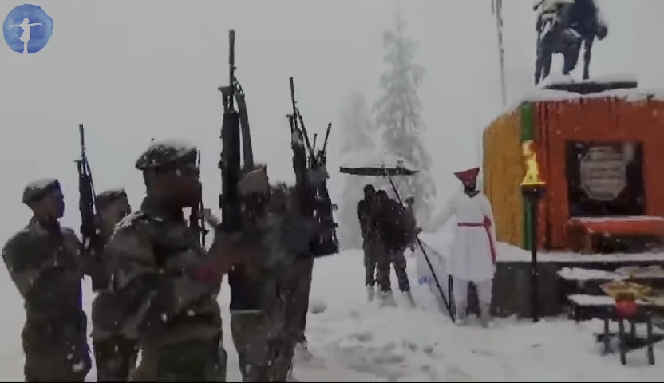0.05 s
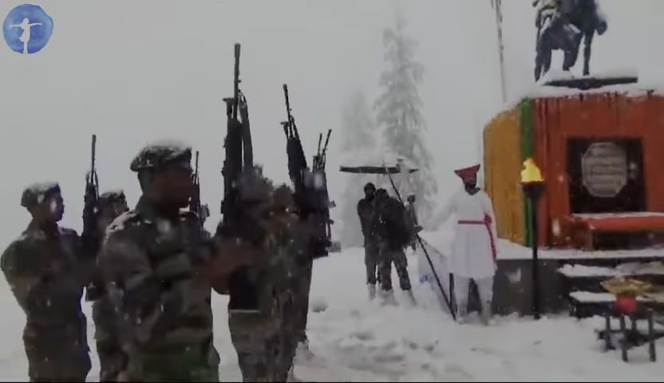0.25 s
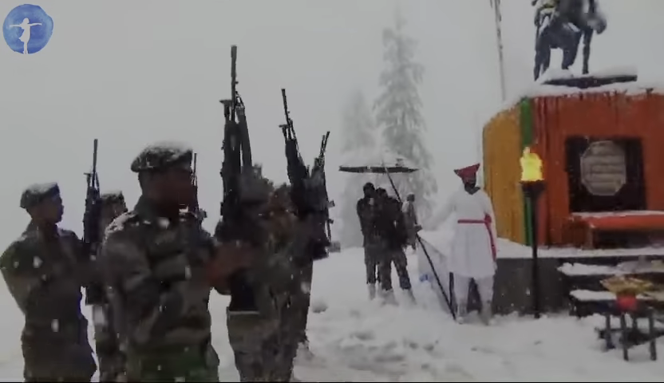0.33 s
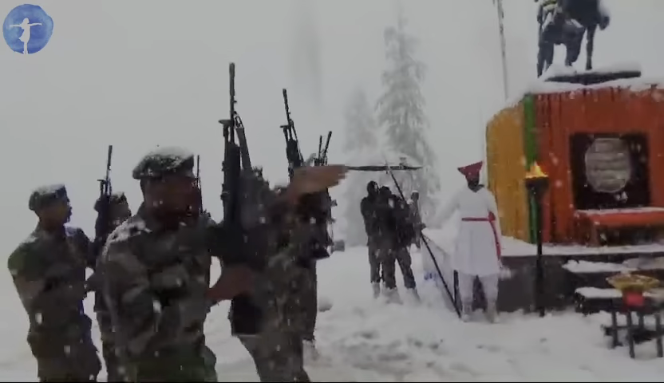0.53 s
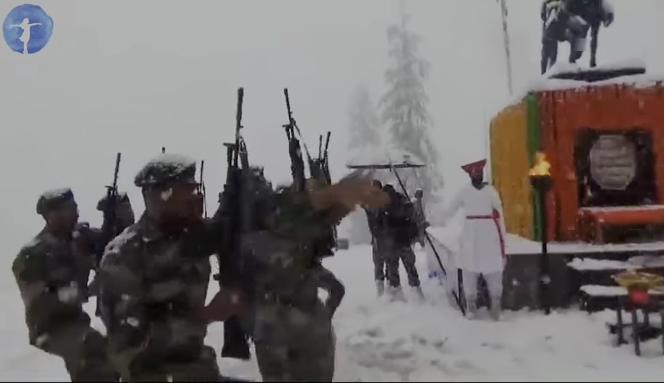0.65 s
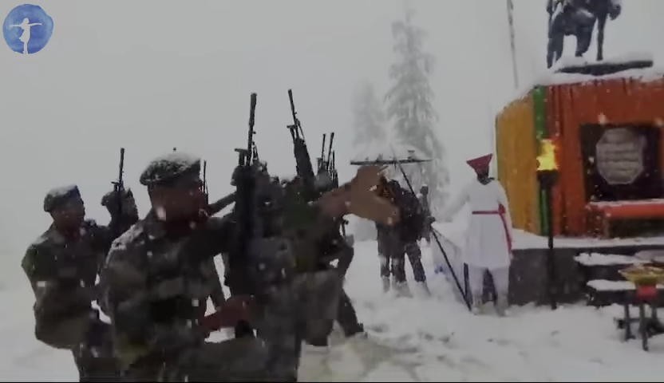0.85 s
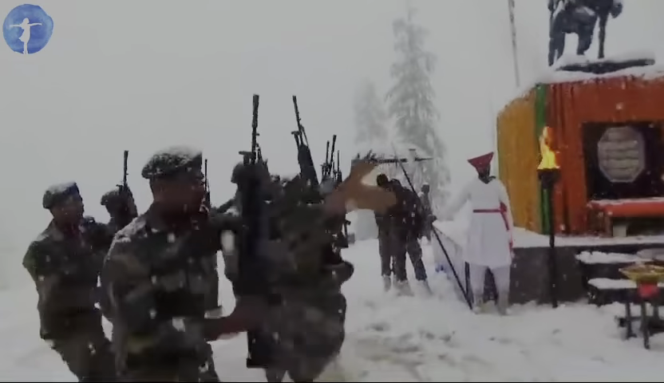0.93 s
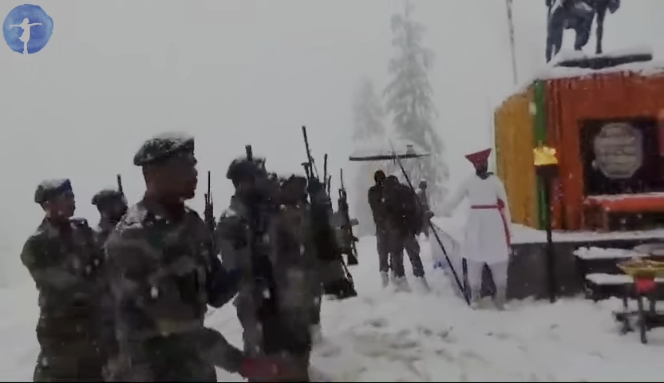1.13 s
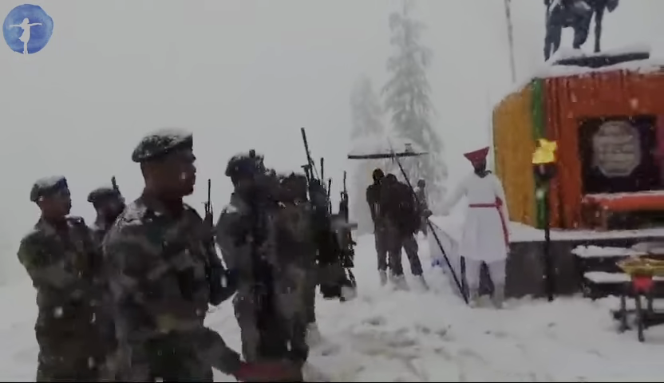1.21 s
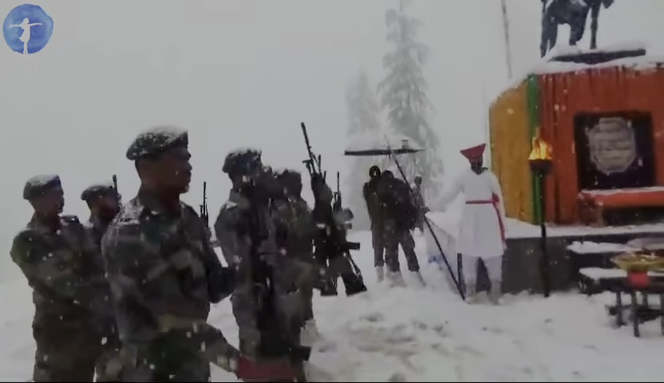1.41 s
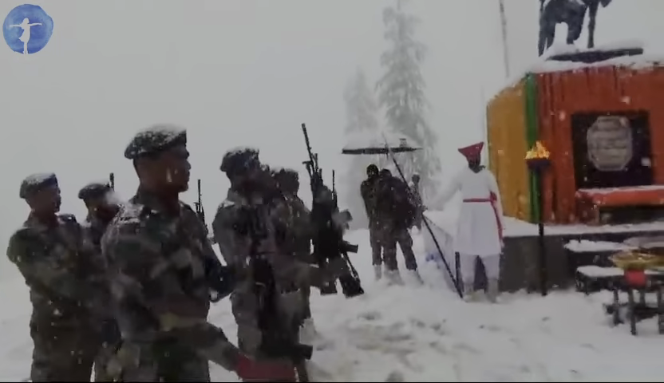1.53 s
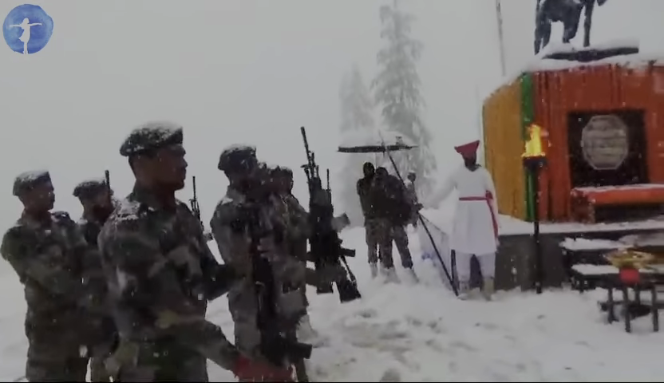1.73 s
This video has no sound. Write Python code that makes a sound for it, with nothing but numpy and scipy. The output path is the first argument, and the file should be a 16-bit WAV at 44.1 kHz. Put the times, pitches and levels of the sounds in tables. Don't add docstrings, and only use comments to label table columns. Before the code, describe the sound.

Soldiers' palms slap rifle hand guards in two ragged volleys, with boot thumps on packed snow

```python
import sys
import numpy as np
from scipy import signal
from scipy.fft import rfft, irfft
from scipy.io import wavfile
from scipy.ndimage import uniform_filter1d

SR = 44100
rng = np.random.default_rng(int(sys.argv[2]) if len(sys.argv) > 2 else 0)


def voltage_ratio(level):
    return 10 ** (np.asarray(level, float) / 20)


def unload_audio(sound):
    columns = np.transpose(np.atleast_2d(sound))
    steps = np.round(np.clip(columns, -1, 1) * 32767)
    wavfile.write(sys.argv[1], SR, steps.astype(np.int16))


N = 79380

# start_s, crack_db, body_db, grip_hz
FIRST_VOLLEY = [(0.2396, -6, -23, 690), (0.2445, -14.5, -16.5, 950), (0.2500, -8, -20, 962),
                (0.2570, -12, -22, 790), (0.2635, -10, -18, 820), (0.2700, -13, -13.5, 1563),
                (0.2757, -7, -10.5, 888), (0.2840, -11, -20, 810), (0.2991, -8, -14.5, 847),
                (0.3040, -13.5, -12, 1588), (0.3090, -8.5, -17.5, 1470), (0.3183, -5.5, -15.5, 880),
                (0.3214, -9, -20, 1524), (0.3304, -14, -16.5, 1206), (0.3392, -17, -14, 1426),
                (0.3440, -15.5, -24, 1560), (0.3500, -12.5, -18, 830), (0.3560, -12.5, -25, 1567),
                (0.3640, -24, -21, 708), (0.3729, -21, -21.5, 1700), (0.3804, -33, -28.5, 1185)]
# start_s, crack_db, body_db, grip_hz
SECOND_VOLLEY = [(1.0546, -28, -13.5, 1620), (1.057, -21, -19.5, 1230), (1.0872, -26, -29, 800),
                 (1.0954, -10.5, -18, 2190), (1.0991, -10, -19, 1560), (1.1024, -14.5, -17, 973),
                 (1.1074, -11, -24, 760), (1.1134, -10.5, -12, 647), (1.1214, -20, -23, 604),
                 (1.1284, -18, -50, 700), (1.1345, -10, -12.5, 1200), (1.1464, -14, -31, 720),
                 (1.1544, -30, -24, 510), (1.1659, -12, -18.5, 1598), (1.1834, -25.5, -17.5, 1110)]
# start_s, crack_db, body_db, grip_hz, ring_factor
STRAY_PALMS = [(0.0034, -32.5, -33.5, 690, 0.41), (0.0511, -18.5, -21, 717, 0.38),
               (0.0836, -37, -27, 1150, 1.13), (0.5153, -16.5, -22.5, 633, 0.69),
               (0.5178, -11.5, -26, 880, 0.38), (0.6434, -21.5, -19, 1883, 1.27),
               (0.6485, -20.5, -20, 710, 0.82), (0.6932, -27, -25, 794, 1.56),
               (0.7206, -23, -23.5, 694, 0.89), (0.977, -50, -33, 650, 1.3), (1.3383, -32, -38, 1100, 0.49)]
# mode_hz, level_db
GUARD_MODES = [(680, 2.5), (745, -1), (850, -2), (1080, -5), (1220, -6.5), (1390, -6), (1550, 2.5),
               (1630, 0.5), (1760, -3.5), (1940, -2.5), (2300, -3)]
# freq_hz, density_db_per_hz
CRACK_COLOUR = [(150, -50), (550, -12), (1500, -1), (2200, -1), (3400, 1), (8200, -4.5), (11000, -7)]
# start_s, level_db
MAGAZINE_KNOCKS = [(0.011, -25.5), (0.034, -29.5), (0.76, -39), (0.644, -12), (0.678, -33), (0.696, -35),
                   (0.721, -27), (0.909, -37), (0.929, -33), (1.031, -29), (1.353, -34), (1.477, -39),
                   (1.604, -41.5), (1.728, -37)]
# start_s, level_db, pitch_hz, t60_s
BOOT_STAMPS = [(0.241, -36, 196, 0.053), (0.262, -36, 257, 0.034), (0.307, -34.5, 129.5, 0.059),
               (0.351, -13, 307, 0.028), (0.513, -14, 184, 0.024), (.585, -37.5, 95, 0.069),
               (0.642, -33, 135, 0.091), (0.7, -37.5, 118, 0.069), (1.086, -21, 147, 0.096),
               (1.107, -9, 299, 0.054), (1.122, -16.5, 99, 0.053), (1.164, -9.5, 142.4, 0.062),
               (1.184, -38, 112, 0.15), (1.207, -29, 113.4, 0.056)]
# start_s, level_db, colour_hz, t60_s
METAL_SNAPS = [(0.2393, -13, 5000, 0.0034), (0.2515, -5.5, 8440, 0.01), (0.262, -8, 5500, 0.013),
               (0.2675, -8, 8800, 0.0087), (0.3015, -16, 6600, .01), (0.3187, -19, 3300, 0.0085),
               (0.3512, -11, 9500, .006), (0.374, -14, 9800, .008), (0.509, -26.5, 2820, 0.052),
               (0.5172, -16, 8350, 0.024), (0.5347, -29, 8500, 0.017), (0.5535, -28, 8400, .04),
               (0.5662, -25, 8300, 0.027), (0.828, -37, 2820, 0.036), (0.846, -39, 1570, 0.037),
               (0.879, -52, 1200, .03), (0.905, -47, 2970, 0.023), (0.935, -46, 3880, 0.029),
               (1.0547, -20, 3000, 0.0081), (1.076, -34, 7500, .015), (1.0877, -13.5, 2580, 0.01),
               (1.0996, -13, 8150, .012), (1.108, -11, 7000, 0.012), (1.1085, -13, 4000, .003),
               (1.114, -15, 7500, 0.0079), (1.1284, -12, 6500, 0.0074), (1.1362, -13, 5550, .006),
               (1.148, -15, 4000, .012), (1.154, -30, 10000, 0.0088), (1.1675, -21, 8250, 0.0048),
               (0.0518, -23.5, 1370, 0.035), (0.2408, -11, 9700, 0.076), (0.246, -18, 575, 0.057),
               (0.521, -16.5, 4250, .012), (0.575, -32, 200, .15), (0.797, -35, 5130, 0.069),
               (0.98, -40.5, 1560, 0.045), (1.0564, -18, 525, 0.039), (1.0565, -14, 2520, .03),
               (1.0585, -15, 4300, 0.017), (1.32, -41.5, 201, 0.16), (1.415, -44, 3470, .02),
               (0.0518, -26.5, 520, 0.034), (0.268, -16.5, 584, 0.078), (0.560, -29, 380, 0.088)]
# start_s, level_db, pitch_hz, ring_factor
SLING_TICKS = [(0.040, -39, 8700, 1.1), (0.096, -35, 4240, 0.82), (0.1125, -33.5, 2900, 0.98),
               (0.1215, -31, 8840, 0.8), (0.196, -39, 2740, 0.81), (0.394, -26.5, 8200, 1.2),
               (0.541, -25.5, 2930, 1.15), (0.520, -18, 4380, 0.8), (0.685, -28, 1570, 2.5),
               (0.7919, -20, 2970, 1), (0.7924, -18.5, 4320, 0.85), (0.822, -43, 7282, 5.5),
               (1.0582, -20.5, 3270, 1), (1.403, -42, 1333, 1.7), (1.680, -40.5, 8000, 1.1)]
# start_s, level_db
GLOVE_SCUFFS = [(1.277, -41.5), (1.288, -44), (1.416, -52), (1.488, -61), (1.534, -47.5), (1.555, -45.5),
                (1.627, -45), (1.665, -43.5), (1.6788, -42.5), (1.692, -41), (1.7329, -40.5),
                (1.7607, -45.5)]
# time_s, level_db
JACKET_MOVEMENT = [(0, -49), (.13, -50.5), (0.229, -53.5), (0.254, -27.5), (.39, -38), (.45, -42.5),
                   (.5, -47), (.515, -49.5), (.565, -38.5), (0.62, -43), (.74, -44.5), (.88, -48),
                   (1.036, -51), (1.078, -26.5), (1.21, -35), (1.272, -40), (1.33, -54), (1.8, -57)]
# freq_hz, density_db_per_hz
CLOTH_COLOUR = [(60, -33.5), (290, -1.5), (450, -7.5), (750, -5), (1900, -9.5), (5000, -17.5), (8300, -12),
                (11000, -25)]
# freq_hz, density_db_per_hz
AIR_COLOUR = [(20, 7), (65, 8.5), (110, 5.5), (700, -10.5), (1100, -18), (6000, -15.5), (8500, -11.5),
              (11000, -23)]

T = np.arange(4096) / SR
OPPOSITE = np.array([[1], [-1]])


def unit(x):
    return x / np.sqrt(np.mean(x ** 2))


def colour(x, table):
    hz, db = np.array(table, float).T
    f = np.fft.rfftfreq(x.shape[-1], 1 / SR) + 1
    gain = voltage_ratio(np.interp(np.log(f), np.log(hz), db))
    return irfft(rfft(x) * gain, x.shape[-1])


def fade(t, t60_s):
    return np.exp(-np.log(1000) * t / np.maximum(t60_s, .002))


def attack(rise_s):
    return np.minimum(T / rise_s, 1)


def add(out, start_s, sound, pan_db):
    i = int(max(start_s, 0) * SR)
    n = min(len(sound), N - i)
    out[:, i:i + n] += sound[:n] * voltage_ratio(OPPOSITE * pan_db / 2)


def walk(rate_hz):
    k = int(SR / rate_hz)
    steps = np.repeat(rng.standard_normal(N // k + 1), k)
    return unit(uniform_filter1d(uniform_filter1d(steps, k), k)[:N])


def palm_crack(ring, chance):
    patchy_db = 2.5
    noise = colour(rng.standard_normal(len(T)), CRACK_COLOUR)
    patches = [(1200 * k, patchy_db * chance[k, 0]) for k in range(2, 10)]
    return unit(colour(noise, patches)) * fade(T, 0.06 * ring)


def guard_ring(grip_hz, ring, scatter, detune):
    lowest_t60_s, jitter, scatter_db, slope_db_per_oct = 0.034, .025, 4, 16
    hz, db = np.array(GUARD_MODES, float).T[:, :, None]
    nearest = hz == hz[np.argmin(np.abs(hz - grip_hz))]
    level_db = db + 2.95 * nearest + scatter_db * scatter
    level_db = level_db - slope_db_per_oct * np.abs(np.log2(hz / grip_hz))
    gain = voltage_ratio(level_db) * (-1) ** np.arange(len(hz))[:, None]
    mode_hz = np.where(nearest, grip_hz, hz * (1 + jitter * detune))
    decay = fade(T, lowest_t60_s * ring * np.sqrt(hz[0] / hz))
    return (gain * np.sin(2 * np.pi * mode_hz * T) * decay).sum(axis=0)


def slaps(table, volley_ring=1):
    out, onset = np.zeros((2, N)), attack(0.00068)
    for start_s, crack_db, body_db, grip_hz, *own_ring in table:
        scatter, detune, chance = rng.standard_normal((3, len(GUARD_MODES), 1))
        ring = np.clip(own_ring[0], .2, 3) if own_ring else volley_ring
        crack = palm_crack(ring, chance) * onset
        body = guard_ring(grip_hz, ring, scatter, detune) * onset
        body = body / np.sqrt(np.mean(body[:220] ** 2))
        slap = voltage_ratio(crack_db - 7.0) * crack + voltage_ratio(body_db - 5.5) * body
        add(out, start_s + .0007, slap, 3.43 * chance[0, 0])
    return out


def knocks():
    out = np.zeros((2, N))
    for start_s, db in MAGAZINE_KNOCKS:
        hz = 704 * (1 + 0.044 * rng.standard_normal())
        ring = np.sin(2 * np.pi * hz * T) * fade(T, 0.042) * (1 - fade(T, 0.0056))
        add(out, start_s, voltage_ratio(db - 6) * ring, 0)
    return out


def stamps():
    attack_s = 0.0026
    modes = ((1.008, -0.81, 0.54), (0.69, 0.079, 1.56), (1.714, 0.19, 0.66))
    out, t = np.zeros((2, N)), np.arange(8192) / SR
    for start_s, db, hz, t60_s in BOOT_STAMPS:
        thump = sum(gain * np.sin(2 * np.pi * hz * ratio * t) * fade(t, t60_s * longer)
                    for ratio, gain, longer in modes)
        push = (1 - fade(t, 6 * attack_s)) ** 2
        add(out, start_s, voltage_ratio(db + 9.0) * thump * push, -1.5)
    return out


def snaps():
    slope_db = -18
    out = np.zeros((2, N))
    for start_s, db, hz, t60_s in METAL_SNAPS:
        noise = rng.standard_normal(len(T))
        peak = [(hz / 4, 1.18 * slope_db), (hz / 2, slope_db), (hz, 0), (2 * hz, slope_db)]
        burst = unit(colour(noise, peak)) * fade(T, t60_s) * attack(0.00017)
        add(out, start_s, voltage_ratio(db - 3.5) * burst, 3.3 * noise[0])
    return out


def ticks():
    t60_s = .010
    out = np.zeros((2, N))
    for start_s, db, hz, ring_factor in SLING_TICKS:
        noise = rng.standard_normal(len(T))
        click = unit(colour(noise, [(hz / 2, -22), (hz, 0), (3 * hz, -7)])) * fade(T, 0.73 * t60_s)
        decay = fade(T, t60_s * np.clip(ring_factor, .4, 8))
        ring = np.sin(2 * np.pi * hz * T) * decay * attack(0.00089)
        add(out, start_s, voltage_ratio(db - 6.5) * (1.8 * click + 3.2 * ring), 3.4 * noise[0])
    return out


def scuffs():
    out = np.zeros((2, N))
    for start_s, db in GLOVE_SCUFFS:
        puff = unit(colour(rng.standard_normal(len(T)), [(700, -11), (2500, 3.5), (10000, 2)]))
        add(out, start_s, voltage_ratio(db) * puff * fade(T, 0.043) * attack(0.00036), 0)
    return out


def rustle():
    grains_per_s, grain_db, grain_t60_s = 450, 4.5, .008
    time_s, db = np.array(JACKET_MOVEMENT).T
    shared = rng.random(N) < grains_per_s / SR / 3
    both = 0
    for hz in 150 * 2. ** np.arange(7):
        hit = shared | (rng.random(N) < grains_per_s / SR)
        hit = hit * voltage_ratio(grain_db * np.minimum(rng.exponential(size=N), 3))
        gate = signal.fftconvolve(hit, fade(T, grain_t60_s))[:N] + 1.24
        octave = [(hz / 8, -36), (hz, 0), (8 * hz, -36)]
        both = both + colour(gate * rng.standard_normal((2, N)), octave)
    mid, side = colour(both, CLOTH_COLOUR)
    level_db = np.interp(np.arange(N) / SR, time_s, db) + 3.55 * walk(30.325)
    return unit(mid + 0.27 * side * OPPOSITE) * voltage_ratio(level_db)


def air():
    level_db, gust_db = -54, 1.5
    mid, side = colour(rng.standard_normal((2, N)), AIR_COLOUR)
    side = colour(side, [(60, -33), (1000, 7.5), (10000, -5)])
    return unit(mid + side * OPPOSITE) * voltage_ratio(level_db - 0.5 + gust_db * walk(10.03))


def yard(mono):
    t60_s, level_db, cutoff_hz = .2, -14.5, 3650
    t = np.arange(SR // 2) / SR
    noise = signal.lfilter(*signal.butter(1, cutoff_hz, fs=SR), rng.standard_normal((2, len(t))))
    mid, side = noise * fade(t, t60_s) * (t > .003)
    tail = mid + 0.39 * side * OPPOSITE
    tail = tail / np.sqrt(np.sum(tail ** 2) / 2)
    return voltage_ratio(level_db) * signal.fftconvolve(mono[None], tail, axes=1)[:, :N]


def port_difference(hits, low):
    lag_s, hits_db, low_db = .0003, -43, -12.5
    late = np.roll(hits.mean(axis=0), int(lag_s * SR)) * voltage_ratio(hits_db)
    quarter = signal.hilbert(low.mean(axis=0)).imag * voltage_ratio(low_db)
    return (late + quarter) * OPPOSITE


def scene():
    hits = slaps(FIRST_VOLLEY, 1.0) + slaps(SECOND_VOLLEY, 0.59) + slaps(STRAY_PALMS) + knocks()
    low = stamps()
    direct = hits + low + port_difference(hits, low)
    echo = yard((hits + low).mean(axis=0))
    return direct + echo + ticks() + scuffs() + rustle() + air() + snaps()


def band_limit(x):
    return signal.sosfilt(signal.butter(12, 12340, fs=SR, output="sos"), x)


def record(dry):
    rounded = np.tanh(0.79 * dry) / 0.83
    trimmed = signal.lfilter(*signal.butter(1, 30, "high", fs=SR), rounded)
    mix = signal.sosfilt(signal.ellip(9, .5, 43, 11150, fs=SR, output="sos"), trimmed)
    return band_limit(mix)


dry = scene()
out = record(dry)
unload_audio(out)
```